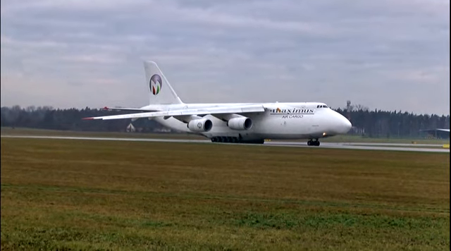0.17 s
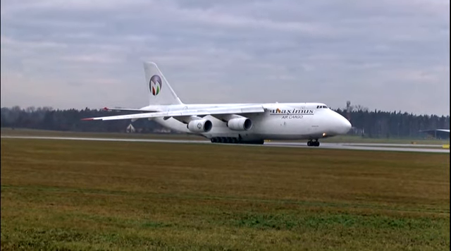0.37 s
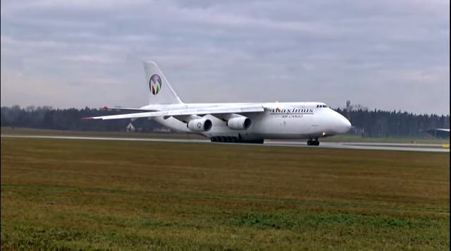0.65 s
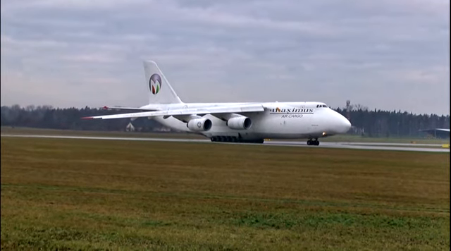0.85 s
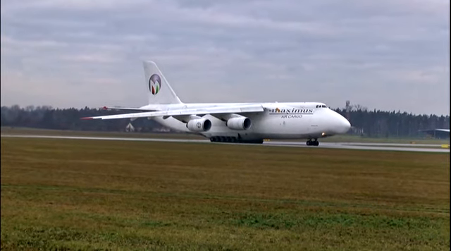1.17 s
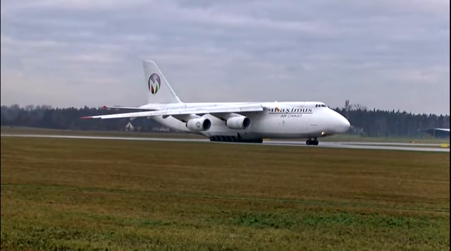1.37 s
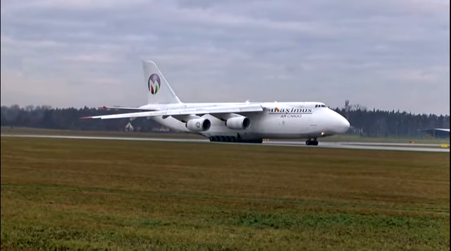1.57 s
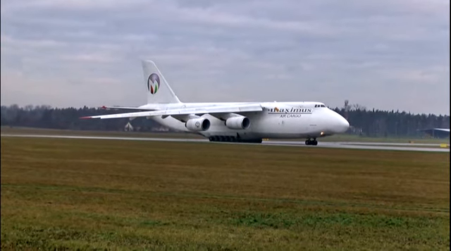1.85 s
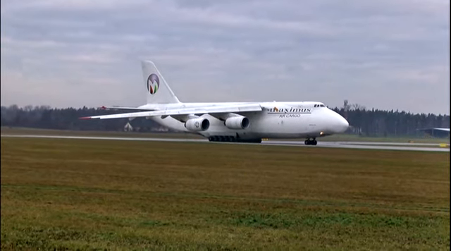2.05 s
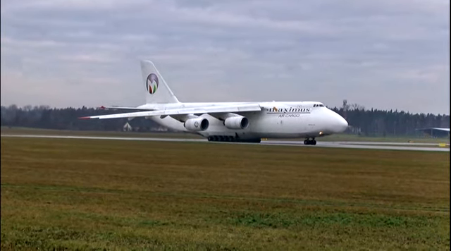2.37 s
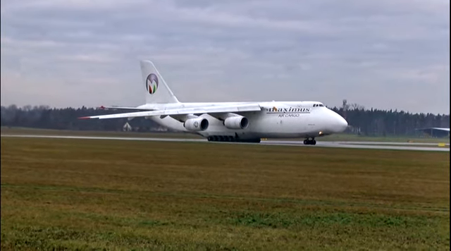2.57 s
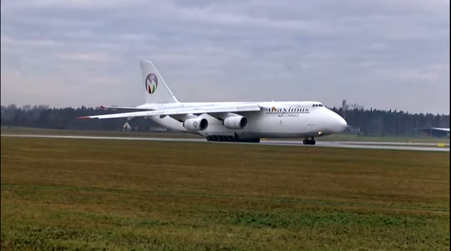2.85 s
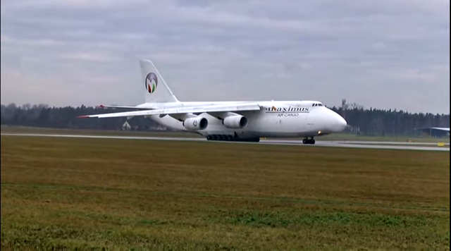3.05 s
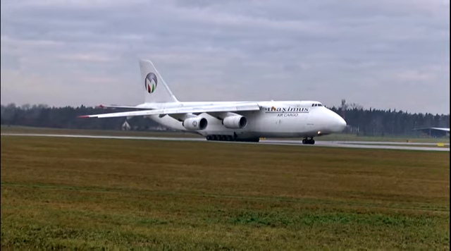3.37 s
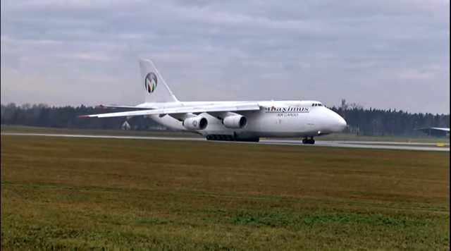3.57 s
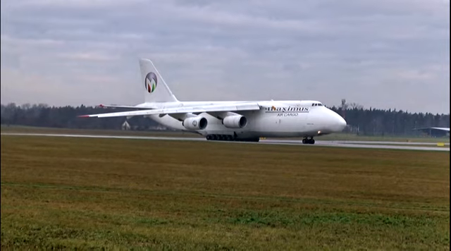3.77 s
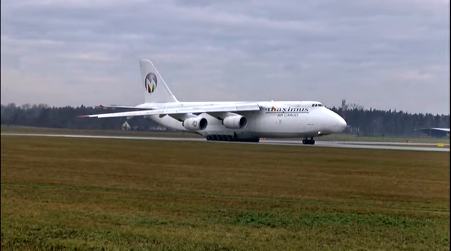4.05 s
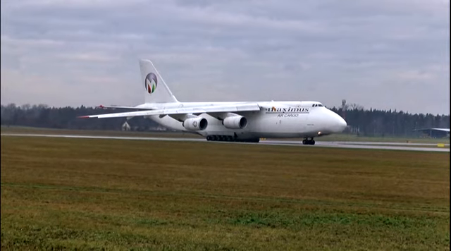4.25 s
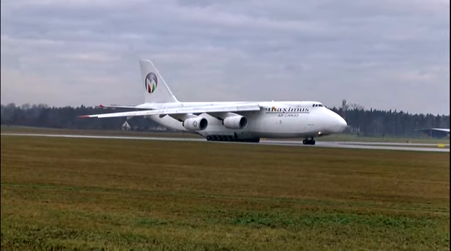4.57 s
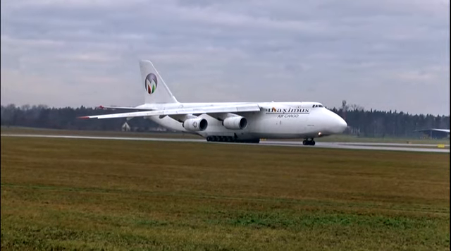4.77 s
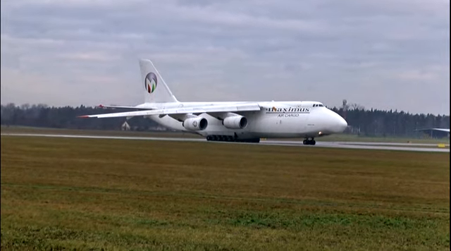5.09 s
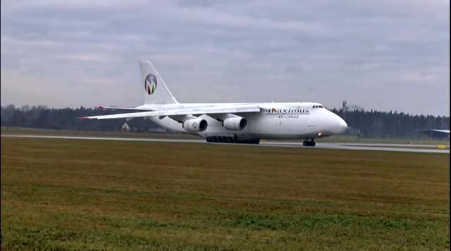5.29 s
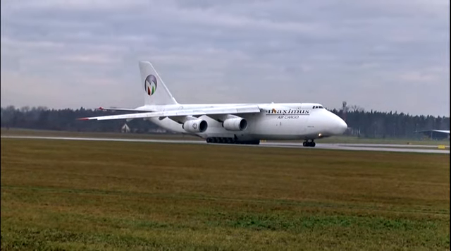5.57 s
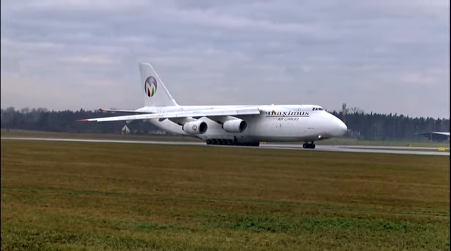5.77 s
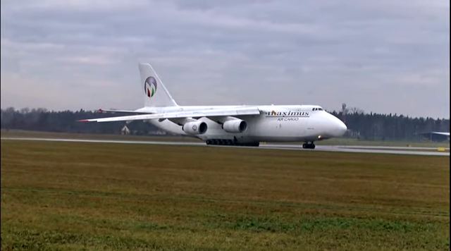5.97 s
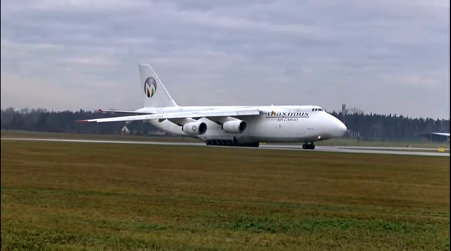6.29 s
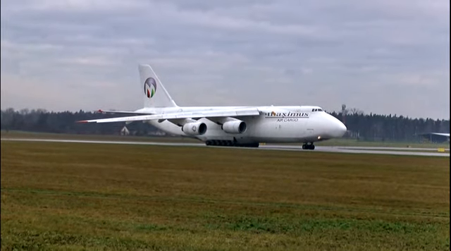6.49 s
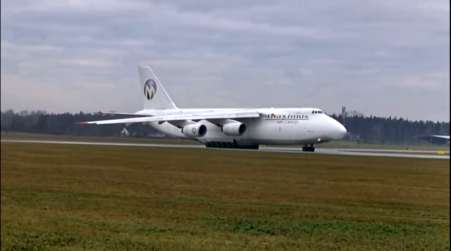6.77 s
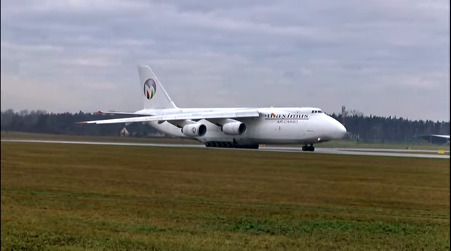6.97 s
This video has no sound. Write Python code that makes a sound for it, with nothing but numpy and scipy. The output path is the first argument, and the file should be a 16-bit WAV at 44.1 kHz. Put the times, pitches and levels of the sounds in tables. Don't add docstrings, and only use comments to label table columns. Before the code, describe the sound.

A large four-engine aircraft idles far off on a runway, giving a continuous airy rush, soft rumble and thin unsteady turbine whine.

```python
import sys
import numpy as np
from scipy import signal
from scipy.fft import rfft, irfft
from scipy.io import wavfile
from scipy.ndimage import uniform_filter1d, minimum_filter1d

SR = 44100
rng = np.random.default_rng(int(sys.argv[2]) if len(sys.argv) > 2 else 0)


def level_to_linear(level):
    exponent = np.asarray(level, float) / 20
    return 10 ** exponent


def store_wav(level_fs):
    pcm = np.round(np.clip(np.atleast_2d(level_fs), -1, 1) * 32767)
    wavfile.write(sys.argv[1], SR, pcm.T.astype(np.int16))


N = 314433
TIME = np.arange(N) / SR
HZ = np.maximum(np.arange(N // 2 + 1) * SR / N, 1)


def in_time(rows):
    s, *columns = np.transpose(rows)
    return [np.interp(TIME, s, column) for column in columns]


def along_hz(points):
    hz, value = np.transpose(points)
    return np.interp(np.log(HZ), np.log(np.maximum(hz, 1)), value)


def rms_one(x):
    return x / np.sqrt(np.mean(x ** 2) + 1e-20)


def drift(rate):
    step = 40
    r = np.exp(-2 * step * np.pi * rate / SR)
    noise = rng.standard_normal(N // step + 2002)
    slow = signal.lfilter([1], [1, -2 * r, r * r], noise)[2000:]
    return np.interp(np.arange(N) / step, np.arange(len(slow)), rms_one(slow - slow.mean()))


# (frequency [Hz], spectral level [dB per Hz])
SCATTERED_SPECTRUM = [(40, -9), (110, -12), (200, -3), (400, -3.5), (1000, 4), (1500, 3), (2300, 5),
                      (3000, 3.5), (4000, -5.5), (5000, -6), (5500, -19), (6200, -10), (8900, -21),
                      (9500, -46)]
SCATTERED_DB = -45.5


def scattered_sound():
    spectrum = rfft(rng.standard_normal(N)) * level_to_linear(along_hz(SCATTERED_SPECTRUM))
    return rms_one(irfft(spectrum, N)) * level_to_linear(SCATTERED_DB)


# (time [s], peak level [dB])
BODY_TICKS = [
    (3.8496, -42),
    (3.859, -53),
]


def body_ticks():
    clicks = np.full(N, 1e-18)
    for s, db in BODY_TICKS:
        clicks[round(s * SR)] = level_to_linear(db)
    band = signal.butter(3, [10300, 12700], "band", fs=SR, output="sos")
    return signal.sosfilt(band, clicks) * 5


# (frequency [Hz], rms level [dB], pitch waver [Hz])
BLADE_TONES = [(2530, -47, 6.0), (2555, -48, 8.0), (3009, -57, 3.0), (3061, -55, 3.0), (4154, -59, 3.0),
               (6023, -68, 4.0)]


def blade_tones(fading_db):
    out = np.zeros(N)
    for hz, db, waver_hz in BLADE_TONES:
        phase = 2 * np.pi * np.cumsum(hz + waver_hz * drift(4.47)) / SR
        out += np.sqrt(2) * np.sin(phase) * level_to_linear(db + fading_db * drift(1.1))
    return out


# (time [s], clarity [dB], extra reach of the shortest waves [dB])
AIR_CLARITY = [(0.0, 0.3, -.5), (0.65, -0.3, -2), (1.05, 1.2, -2), (1.85, 0.9, 0), (2.45, 0.5, 2.5),
               (3.2, 0.5, 1.5), (3.85, -1.5, 4.5), (4.3, -0.7, 2), (5.0, -.9, 2), (5.6, -1.5, -1.8),
               (6.1, -1.1, 0), (6.6, -.5, 0.5), (7.13, 0.2, -1)]
FLUTTER_DB, FLUTTER_PER_S = 0.5, 4.6


def air_path():
    clarity, reach = in_time(AIR_CLARITY)
    return clarity + FLUTTER_DB * drift(FLUTTER_PER_S), reach


# (time [s], swell [dB])
EDDY_SURGES = [(1.0, 2), (2.35, 1.5), (3.25, 2.5), (4.35, 0.5), (4.82, 1.5), (5.6, .5), (6.2, 0.7),
               (6.55, 1)]
SURGE_S = 0.14


def eddy_surges():
    return sum(db * np.exp(-((TIME - s) / SURGE_S) ** 2) for s, db in EDDY_SURGES)


# (frequency [Hz], spectral level [dB per Hz])
JET_SPECTRUM = [(22, -23), (50, -15.5), (68, 3), (125, 2.5), (230, -11), (420, -17), (640, -1), (1100, -2),
                (2600, 0), (3700, -8), (5600, -14.5), (7800, -24.5), (10800, -51.5), (15000, -84)]
# (frequency [Hz], width [Hz], gain [dB])
HOUSING_BUMPS = [(76.2, 12, -8), (697, 340, 3), (940, 370, -4), (1364, 160, 5), (2851, 340, -7.5),
                 (3990, 310, -5.5), (4410, 150, -4.5), (6000, 280, -2.5), (6500, 270, -8.5),
                 (6860, 250, -5), (8800, 600, -0.5), (533, 70, -3.5), (260, 60, -1), (1580, 130, -1.5),
                 (68, 12, 2), (4000, 180, 2), (2650, 120, 2), (187, 55, 1.5), (3300, 620, 1)]
CROSSOVERS = [400, 1100, 2850, 6000, 8800]
# (level [dB], share of clarity [ratio], share of reach [ratio], slow swell [dB per s])
JET_LAYERS = [
    (-35.5, -0.43, .01, 0.28),
    (-33.5, -0.51, .01, 0.1),
    (-25, -0.02, .01, 0.02),
    (-33.5, 0.61, .01, -0.09),
    (-47, 1.5, .05, 0.25),
    (-60.5, 1.1, 1.05, -0.2),
]
EDDY_SHARES = [1.1, 0.28, .05, .01, .01, .01]


def jet_noise(shimmer_db):
    clarity, reach = air_path()
    surge = eddy_surges()
    bumps = sum(db / (1 + (2 * (HZ - hz) / width) ** 2) for hz, width, db in HOUSING_BUMPS)
    noise = rfft(rng.standard_normal(N)) * level_to_linear(along_hz(JET_SPECTRUM) + bumps)

    below = [np.zeros(len(HZ))]
    below += [1 / (1 + (HZ / hz) ** 12) for hz in CROSSOVERS]
    below += [np.ones(len(HZ))]
    out = np.zeros(N)
    layers = zip(below, below[1:], JET_LAYERS, EDDY_SHARES, shimmer_db)
    for low, high, (db, clear, far, swell), eddy, shimmer in layers:
        path_db = clear * clarity + far * reach
        source_db = swell * (TIME - TIME.mean()) + eddy * surge
        moving_db = path_db + source_db + shimmer * drift(7.3)
        out += rms_one(irfft(noise * (high - low), N)) * level_to_linear(db + moving_db)
    return out


# (time [s], depth [dB])
GAIN_DUCKS = [(0.06, 1.5), (0.51, 1.0), (0.7, 0.4), (1.15, 1), (1.655, 2), (2.17, 0.5), (2.675, 2.5),
              (2.83, 0.5), (3.02, 2), (3.17, 0.5), (3.53, 1.5), (3.88, 0.9), (4.45, 1.3), (4.89, 1.5),
              (5.08, .8), (5.28, 0.5), (5.74, 1.0), (6.25, 1.2), (6.66, 1), (6.98, 1.5)]
DUCK_S, CREEP_S = 0.017, 0.31


def gain_ducking():
    gain_db = np.zeros(N)
    for s, db in GAIN_DUCKS:
        since = np.maximum(TIME - s, 0)
        gain_db -= db * np.minimum(since / DUCK_S, 1) * np.exp(-since / CREEP_S)
    return gain_db


# (frequency [Hz], left minus right [dB])
CAPSULE_SHADE = [(300, 2), (450, -1.2), (800, .3), (1050, -3), (1500, 0.4), (2000, 1.7), (2400, -.1),
                 (2850, 0.5), (3300, 1.9), (4300, 1), (5200, 0), (6400, 1.9), (7200, -0.5), (8700, -1.5)]
# (frequency [Hz], left ahead of right [rad])
CAPSULE_LEAD = [(350, -0.27), (550, 0.12), (900, -0.17), (1250, 0.12), (1750, 0.23), (2100, -.03),
                (2800, -.06), (3020, .23), (3700, -.03), (5000, -0.22), (5900, .08), (6800, -.25),
                (8000, -.1), (8800, .07)]


def capsules(front, scattered):
    shaded = 1 / (1 + (260 / HZ) ** 4)
    level = level_to_linear(shaded * along_hz(CAPSULE_SHADE) / 2)
    half = level * np.exp(0.5j * shaded * along_hz(CAPSULE_LEAD))
    spectrum = rfft(front)
    left = irfft(spectrum * half, N) + scattered
    right = irfft(spectrum / half, N) - scattered
    return np.array([left, right])


def scene():
    riding = level_to_linear(gain_ducking())
    jet = jet_noise(shimmer_db=[0.57, 0.21, 0.33, 0.35, 0.6, 0.48])
    engines = jet + level_to_linear(-0.2) * blade_tones(fading_db=3.5)
    front = riding * engines + body_ticks()
    return capsules(front, riding * scattered_sound())


def low_pass(x):
    return signal.sosfilt(signal.butter(12, 13600, fs=SR, output="sos"), x)


def record(dry):
    peak = np.abs(dry).max(axis=0)
    room_left = np.minimum(1, 0.275 / (peak + 1e-9))
    gain = uniform_filter1d(minimum_filter1d(room_left, size=130), size=64)
    gain = gain * np.minimum(1, np.arange(N) / 60)
    return low_pass(dry * gain)


dry = scene()
out = record(dry)
store_wav(out)
```